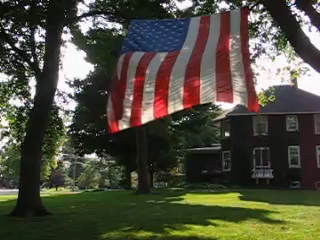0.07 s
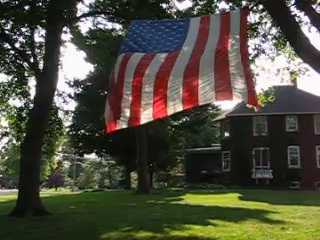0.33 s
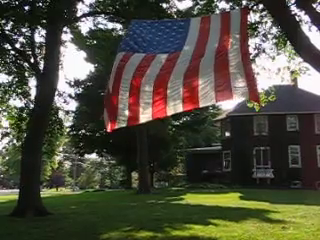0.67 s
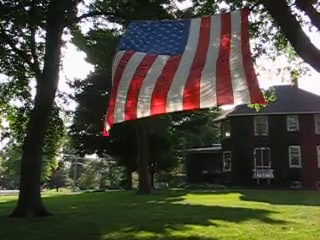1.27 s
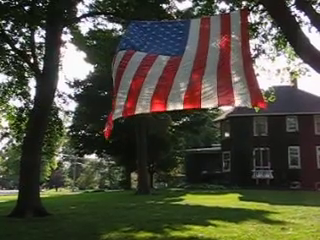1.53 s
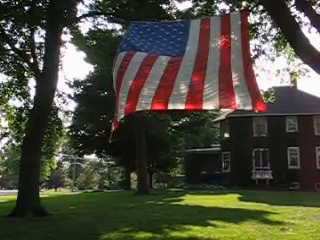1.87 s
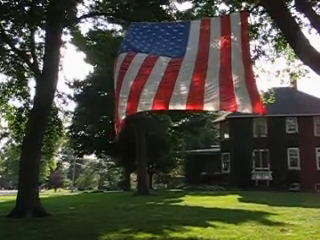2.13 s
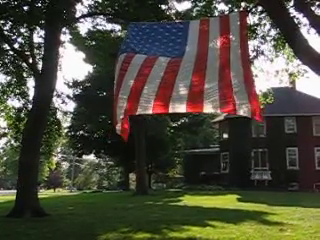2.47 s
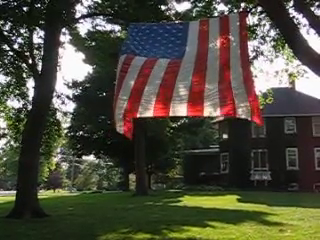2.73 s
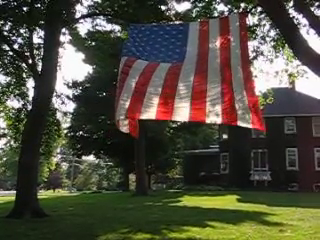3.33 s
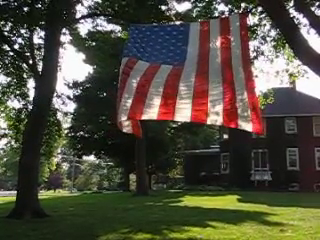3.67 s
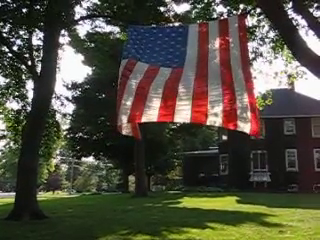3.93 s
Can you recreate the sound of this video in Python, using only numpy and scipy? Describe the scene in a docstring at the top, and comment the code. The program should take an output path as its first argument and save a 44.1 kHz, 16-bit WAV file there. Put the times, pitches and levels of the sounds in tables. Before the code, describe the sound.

Low distant traffic rumble outdoors, with faint birds and one close knock and sharp snap.

```python
"""A shaded lawn: distant traffic rumbles under a wash of tyres, leaves hiss faintly, and a few small
birds whistle and rasp, their calls scattered by the trees. Something close to the camera knocks, then
snaps; the snap overloads the input and the gain control ducks the background for half a second.
The camera's own faint whine and hiss stay level."""
import sys
import numpy as np
from scipy import signal
from scipy.fft import rfft, irfft
from scipy.io import wavfile
from scipy.ndimage import uniform_filter1d, minimum_filter1d

SR = 44100
rng = np.random.default_rng(int(sys.argv[2]) if len(sys.argv) > 2 else 0)


def store_wav(level_fs):
    """Save 16-bit WAV to argv[1]."""
    pcm = np.round(np.clip(np.atleast_2d(level_fs), -1, 1) * 32767)
    wavfile.write(sys.argv[1], SR, pcm.T.astype(np.int16))


N = 176400
TIME = np.arange(N) / SR
ATTACK_S = 0.0028  # how fast the duck and the overload's offset set in


def amp(db):
    """Decibels to gain."""
    return 10 ** (np.asarray(db) / 20)


def unit(x):
    """Scales to an rms of one."""
    return x / np.sqrt(np.mean(x ** 2) + 1e-20)


def add(mix, start_s, sound):
    """Mixes a sound in at a time."""
    part = mix[round(start_s * SR):][:len(sound)]
    part += sound[:len(part)]


def noise(eq, size):
    """Steady noise at unit rms, shaped by an EQ curve and silent above its last point."""
    freq_hz, gain_db = np.transpose(eq)
    bins_hz = np.fft.rfftfreq(size, 1 / SR)
    curve = amp(np.interp(np.log(bins_hz + 1), np.log(freq_hz), gain_db, right=-100))
    return unit(irfft(rfft(rng.standard_normal(size)) * curve, size))


def drift(rate_hz):
    """Smooth random wandering at unit rms."""
    rolloff = np.exp(-(np.fft.rfftfreq(N, 1 / SR) / rate_hz) ** 2)
    return unit(irfft(rfft(rng.standard_normal(N)) * rolloff, N))


def wash(eq, patchy_db):
    """Noise whose level drifts in patches of time and frequency."""
    frames = signal.stft(noise(eq, N), SR, nperseg=1024, noverlap=768)[2]
    patches = uniform_filter1d(rng.standard_normal(frames.shape), size=5, axis=0)
    patches = unit(uniform_filter1d(patches, size=12, axis=1))
    return unit(signal.istft(frames * amp(patchy_db * patches), nperseg=1024, noverlap=768)[1][:N])


def traffic():
    """Engine rumble and tyre wash from far roads, swelling gently together."""
    # Engine and tyre tone: freq_hz, gain_db
    rumble_eq = [(15, -9.5), (35, -1), (70, 0.5), (100, -1), (160, -2), (210, -1.5), (300, -9.5),
                 (420, -22.5), (900, -51.5)]
    tyre_eq = [(100, -3.5), (380, -1), (620, -1), (800, -0.5), (1050, 0.5), (1230, -7), (1450, -16),
               (2100, -22.5), (5000, -47)]
    # Traffic swell: time_s, gain_db
    swell = [(0, 2.5), (.6, 3), (1.15, 1), (2.1, 0), (2.7, -0.14), (3.3, 0.5), (4, 1)]
    swell_db = np.interp(TIME, *np.transpose(swell))
    rumble = amp(-32 + swell_db) * wash(rumble_eq, patchy_db=0.32)
    tyres = amp(-38.5 + 0.64 * swell_db) * wash(tyre_eq, patchy_db=0.88)
    return rumble + tyres


def leaves():
    """Faint even hiss of the trees, easing slowly."""
    # Leaf tone: freq_hz, gain_db
    leaf_eq = [(600, -10), (1500, -7.5), (2600, 0.5), (3400, -2.5), (4200, 3.5), (4600, -1.5), (5050, 1.5),
               (5600, -7), (6000, -19), (6400, -61.5)]
    ease_db_per_s = 0.75
    return amp(-47.5 - ease_db_per_s * TIME) * wash(leaf_eq, patchy_db=0.64)


def camera():
    """Thin wavering whine and hiss of the camera itself."""
    # Whine partials: pitch_hz, level_db
    partials = [(1351, -62.5), (1570, -66), (1825, -61.5), (2977, -70), (3564, -65.5), (3801, -67.5)]
    # Hiss tone: freq_hz, gain_db
    hiss_eq = [(100, -2.5), (1600, -2), (3000, -1), (4200, -0.5), (5100, -7), (5600, -6), (6000, -17.5),
               (6400, -52)]
    whine = np.zeros(N)
    for pitch_hz, level_db in partials:
        wavering_hz = pitch_hz + 5 * drift(rate_hz=25)
        whine += amp(level_db) * unit(np.sin(2 * np.pi * np.cumsum(wavering_hz) / SR))
    return whine + amp(-55.5) * noise(hiss_eq, N)


def bird_whistles():
    """Tiny warbling notes, each gliding through three pitches."""
    # Notes: start_s, length_s, level_db, start_hz, middle_hz, end_hz
    notes = [(.2, .02, -49, 5240, 4500, 4000), (.213, .026, -40.5, 3970, 3830, 3780),
             (0.192, .035, -53.5, 3100, 2800, 2600), (0.237, .022, -54, 4760, 5100, 5300),
             (0.788, 0.16, -57.5, 3110, 3235, 3040), (1.696, 0.028, -49.5, 5050, 4360, 4230),
             (1.725, 0.019, -48.5, 4260, 4800, 5300), (2.8, .04, -52, 3530, 3100, 3100),
             (2.846, .055, -52.5, 3460, 3150, 2750), (3.069, .075, -51.5, 2965, 3190, 3240),
             (3.082, 0.051, -52.5, 3780, 3650, 3630)]
    out = np.zeros(N)
    warble_hz = 111 * drift(rate_hz=300)
    for start_s, length_s, level_db, *glide_hz in notes:
        progress = np.linspace(0, 1, round(length_s * SR))
        pitch_hz = np.polyval(np.polyfit([0, .5, 1], glide_hz, 2), progress)
        pitch_hz += warble_hz[round(start_s * SR):][:len(progress)]
        envelope = np.sin(np.pi * progress ** 1.3)
        tone = np.sin(2 * np.pi * np.cumsum(pitch_hz) / SR)
        add(out, start_s, amp(level_db) * unit(envelope * tone))
    return out


def tree_scatter(calls, t60_s=0.29, wet_db=-2):
    """The trees trail each call with a short tail of sparse echoes."""
    t = TIME[:SR // 2]
    echoes = rng.standard_normal(len(t)) * (rng.random(len(t)) < .05) * amp(-60 * t / t60_s)
    return calls + amp(wet_db) * signal.fftconvolve(calls, echoes / np.linalg.norm(echoes))[:N]


def strike(modes, rise_s, crack_db, crack_t60_s=.012):
    """One hard contact: damped modes of alternating sign and a short crack of noise."""
    # Crack tone: freq_hz, gain_db
    crack_eq = [(200, 1.5), (1500, 42), (3000, -22), (5000, -11.5), (5800, -38), (6400, -73.5)]
    t = TIME[:SR // 2]
    ring = sum((-1) ** k * amp(level_db - 60 * t / t60_s) * np.sin(2 * np.pi * pitch_hz * t)
               for k, (pitch_hz, level_db, t60_s) in enumerate(modes))
    crack = amp(crack_db - 60 * t / crack_t60_s) * noise(crack_eq, len(t))
    onset = np.sin(np.pi / 2 * np.minimum(t / rise_s, 1)) ** 2
    return (ring + crack) * onset


def knock():
    """A dull, close knock: two contacts in quick succession."""
    # Contacts: start_s, gain_db
    contacts = [(1.1736, 1.5), (1.1754, 0.5)]
    # Knock resonances: pitch_hz, level_db, t60_s
    modes = [(184.9, -27, 0.088), (440, -6, 0.006), (546, -31.5, .13), (733, -8, 0.015),
             (1002, -16.5, 0.033), (1230, -2, 0.0052), (1560, -17, 0.015), (2000, -11.5, 0.0092),
             (3570, -21.5, .01), (4750, -19.5, 0.0084)]
    out = np.zeros(N)
    for start_s, gain_db in contacts:
        add(out, start_s, amp(gain_db) * strike(modes, rise_s=0.00036, crack_db=-28))
    return out


def snap(start_s=1.2144):
    """One loud, bright contact that leaves a faint low ring."""
    # Snap resonances: pitch_hz, level_db, t60_s
    modes = [(323.5, -23.5, .38), (420, -19, .12), (590, -23, .04), (845, -13, .02), (2190, -8, 0.014),
             (2345, -11, .012), (2810, 16, .0026), (4470, -14, 0.00895), (5370, -12, 0.0063)]
    out = np.zeros(N)
    add(out, start_s, strike(modes, rise_s=0.00077, crack_db=-15.5))
    return out


def gain_control(treble, limit_db=-10, hold_s=0.12, recover_db_per_s=22):
    """Gain that drops fast on a treble peak, holds, and climbs back steadily."""
    over_db = np.maximum(20 * np.log10(abs(treble) + 1e-9) - limit_db, 0)
    half_hold = round(hold_s * SR / 2)
    held_db = -minimum_filter1d(-over_db, 2 * half_hold + 1, origin=half_hold)
    recovery_db = recover_db_per_s * TIME
    duck_db = np.maximum.accumulate(held_db + recovery_db) - recovery_db
    pole = np.exp(-1 / (ATTACK_S * SR))
    return amp(-signal.lfilter([1 - pole], [1, -pole], duck_db))


def overload(treble, ceiling=.66, kick=0.059, settle_s=1.1):
    """The treble flattens at the ceiling; its tallest peak kicks the input off centre."""
    since_s = TIME - TIME[np.argmax(abs(treble))]
    offset = kick * np.clip(since_s / ATTACK_S, 0, 1) * np.exp(-abs(since_s) / settle_s)
    return np.clip(treble, -ceiling, ceiling) + offset


def bird_rasps():
    """Two harsh calls: short puffs of bright noise."""
    # Calls: start_s, length_s, level_db
    calls = [(1.788, 0.065, -45), (2.005, 0.056, -47)]
    # Rasp tone: freq_hz, gain_db
    rasp_eq = [(1500, -28), (2300, -2.5), (2650, -2.5), (3000, 2), (3500, -6), (4050, 3.5), (4500, -12),
               (5500, -8.5), (6300, -57.5)]
    rasp = noise(rasp_eq, N)
    out = np.zeros(N)
    for start_s, length_s, level_db in calls:
        progress = np.clip((TIME - start_s) / length_s, 0, 1)
        out += amp(level_db) * rasp * np.sin(np.pi * progress ** 0.61)
    return out


def scene():
    """A mono bed of traffic and leaves, birds in the trees, the knock and snap up close."""
    bed = traffic() + leaves()
    birds = tree_scatter(bird_whistles() + bird_rasps())
    return (bed + birds + knock() + snap())[None]


def record(dry, mic_hz=6000, split_hz=2300, edge_hz=16350):
    """A dull microphone, ducking and treble overload, then camera noise and a band limit."""
    mic = signal.fftconvolve(dry[0], signal.firwin(101, mic_hz, fs=SR), "same")
    body = signal.fftconvolve(mic, signal.firwin(101, split_hz, fs=SR), "same")
    treble = mic - body
    gain = gain_control(treble)
    mix = gain * body + overload(gain * treble) + camera()
    band_limit = signal.firwin(255, edge_hz, window=("kaiser", 9), fs=SR)
    return signal.fftconvolve(mix, band_limit, "same")[None]


dry = scene()
out = record(dry)
store_wav(out)
```